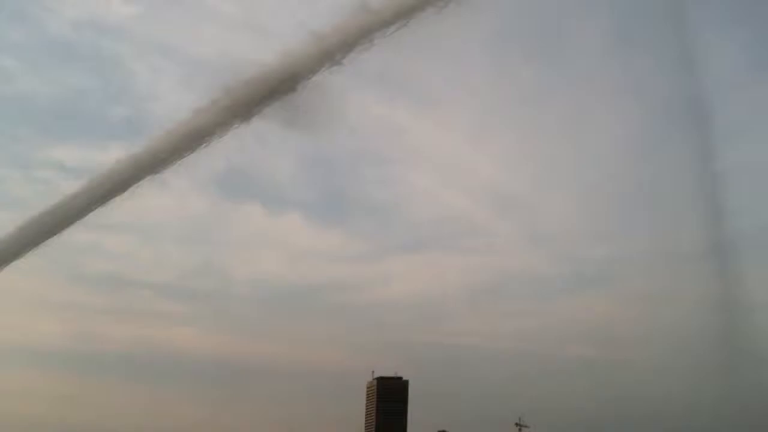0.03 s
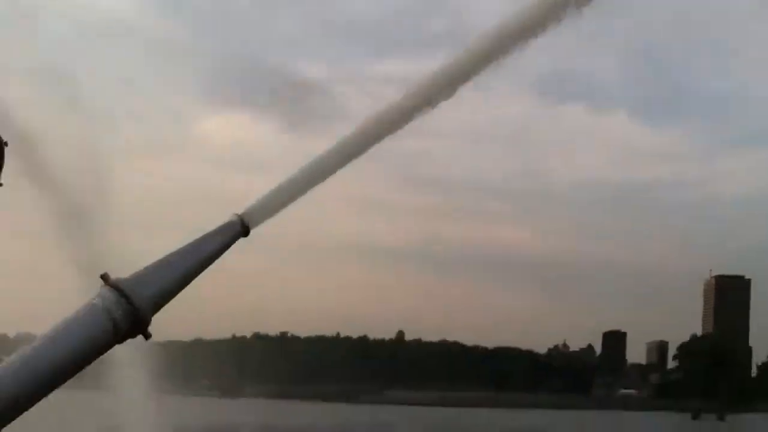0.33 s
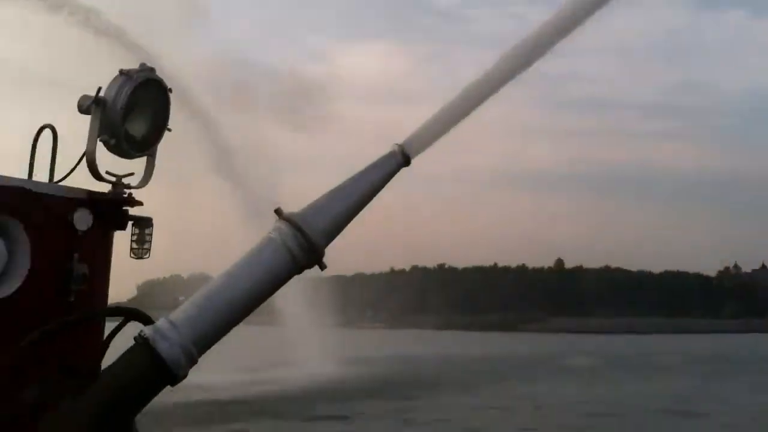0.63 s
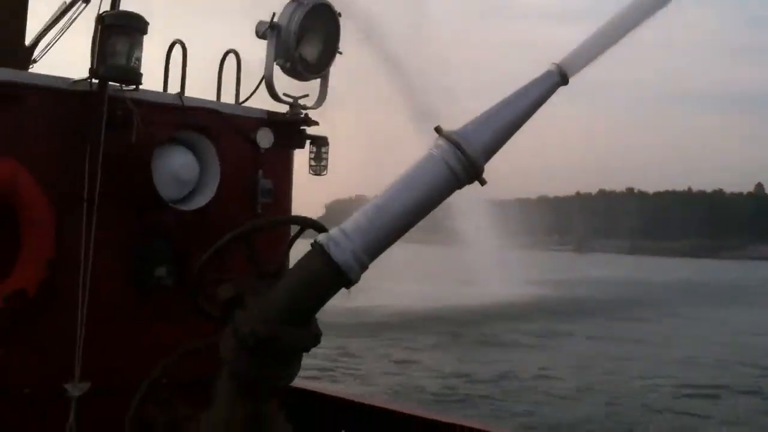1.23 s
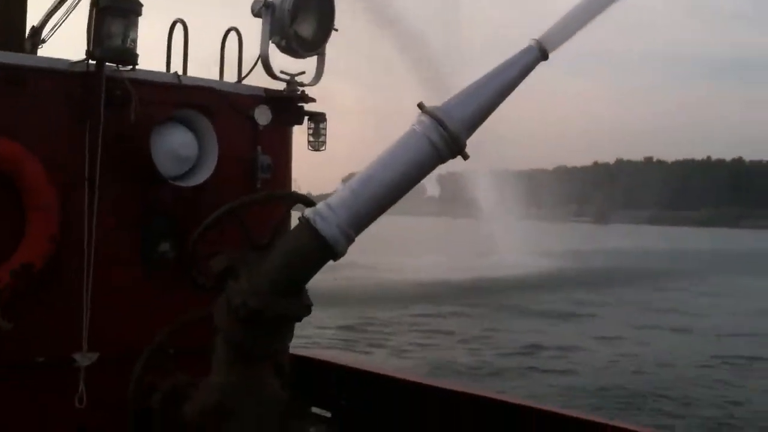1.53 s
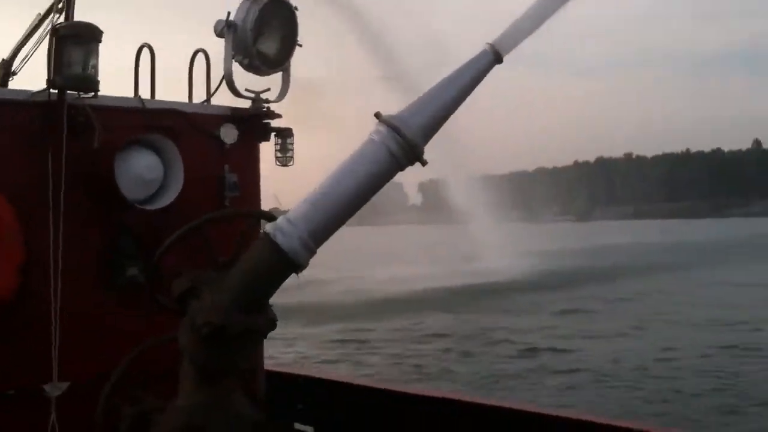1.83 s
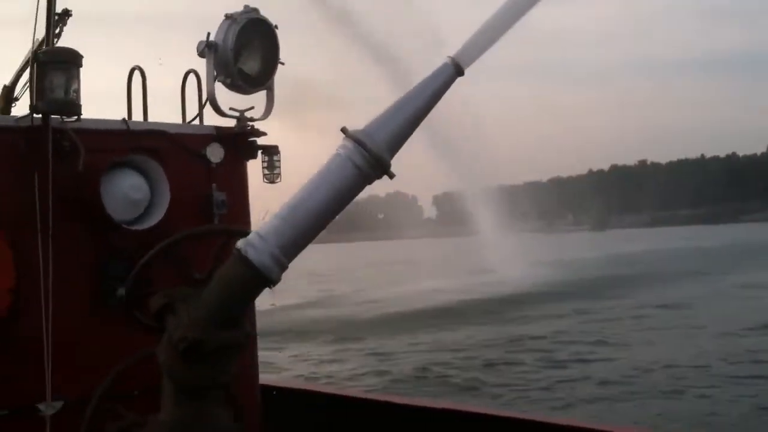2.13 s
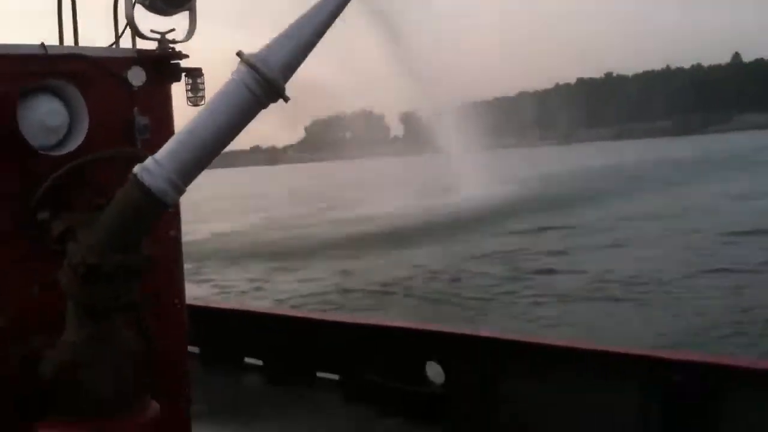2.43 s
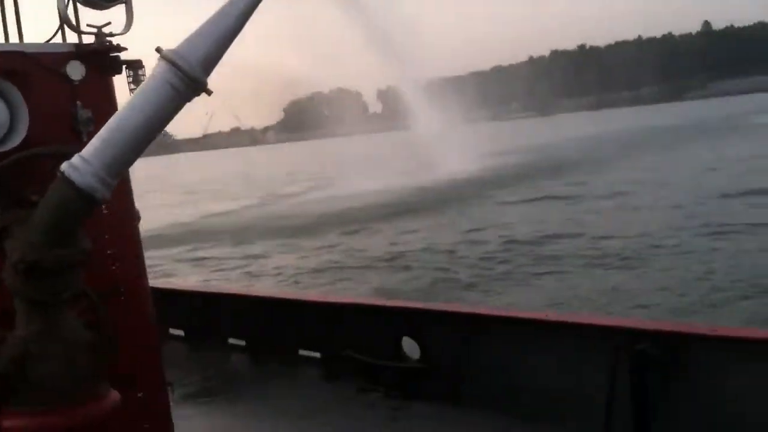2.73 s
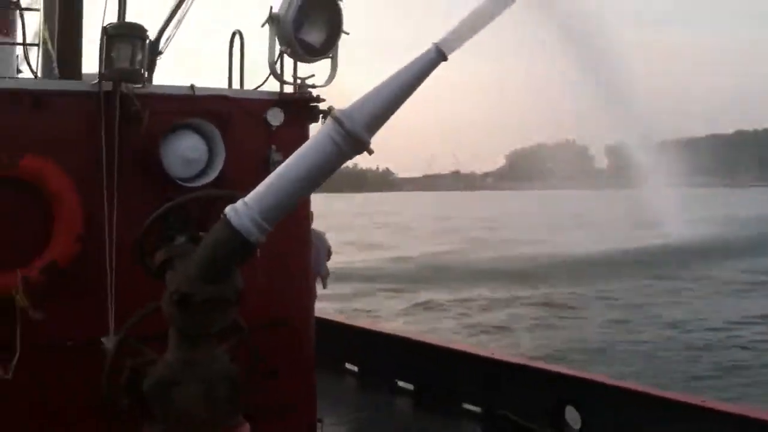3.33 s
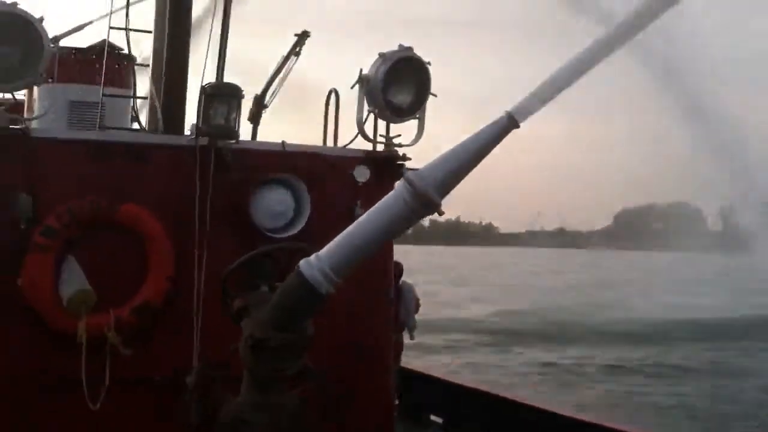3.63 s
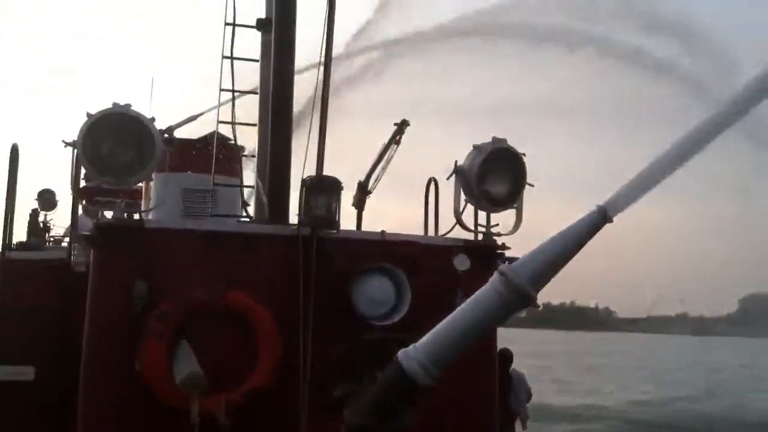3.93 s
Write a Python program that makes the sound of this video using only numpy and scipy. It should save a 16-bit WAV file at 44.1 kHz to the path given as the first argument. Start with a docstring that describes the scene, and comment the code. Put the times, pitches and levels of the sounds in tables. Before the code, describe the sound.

A jet of water rushes and softly spits from a cannon on a fire boat, while engines hum and rumble below deck. As the microphone backs away from the nozzle, the hiss thins and the machinery sounds boomier.

```python
"""A water cannon on the deck of a fire boat throws a steady jet over open water.
The churning jet rushes, spits now and then, and sheds a fine spray of hissing droplets.
Below deck the pump's diesel throbs and beats against the hum of a second, faster machine,
and the machinery makes the hull rumble. As the listener steps slowly back from the nozzle,
the spray fades and a boom from the deckhouse swells."""
import sys
import numpy as np
from scipy import signal
from scipy.fft import rfft, irfft
from scipy.io import wavfile
from scipy.ndimage import uniform_filter1d

SR = 44100
rng = np.random.default_rng(int(sys.argv[2]) if len(sys.argv) > 2 else 0)


def int16_out(signal):
    """Quantize to a 16-bit WAV file."""
    q = np.round(np.clip(np.atleast_2d(signal).T, -1, 1) * 32767)
    wavfile.write(sys.argv[1], SR, q.astype(np.int16))


N = 176400
T = np.arange(N) / SR
FREQS_HZ = np.fft.rfftfreq(N, 1 / SR)
DIESEL_CYCLE_HZ, SHAFT_HZ = 9.5, 28.77

# The tone of the jet's rush. Each row: frequency in Hz, relative level in dB.
JET_SPECTRUM = [(100, -17), (400, -1.5), (720, 1), (1020, -1), (1350, -7), (1750, -9.5), (2400, -16.5),
                (3200, -23.5), (4000, -24), (5000, -29), (7000, -35.5), (10000, -42.5), (12500, -46),
                (15500, -54)]
# How loud the rush is. Each row: time in seconds, level in dB.
JET_LEVELS = [(0, -49), (.6, -51), (1.4, -51), (2, -51.5), (2.8, -51.5), (3.4, -51), (4, -51.5)]
# A hollow note in the rush. Each row: time in seconds, level in dB.
HOLLOW_LEVELS = [(0, -70), (1, -59), (1.6, -65), (2.35, -59), (2.68, -61.5), (2.8, -53), (2.9, -60),
                 (3.02, -61), (3.2, -65), (3.7, -64), (4, -55.5)]
# The tone of the spray's hiss. Each row: frequency in Hz, relative level in dB.
SPRAY_SPECTRUM = [(500, -11.5), (1500, 4.5), (2500, 7.5), (4200, -5), (5500, -12), (10000, -25),
                  (12500, -25), (15500, -34)]
# How loud the spray is. Each row: time in seconds, level in dB.
SPRAY_LEVELS = [(0, -71), (.4, -67), (.7, -67.5), (1.35, -66.5), (1.6, -68.5), (2.2, -68), (2.9, -70),
                (3.3, -75), (4, -77)]
# The diesel's tones. Each row: multiple of its cycle rate, level in dB before the swell.
DIESEL_TONES = [(6, -69.5), (8, -62), (9, -60.5), (10, -57.5), (12, -57), (13, -52), (14, -51), (15, -48),
                (16, -58.5), (17, -52), (18, -48), (19, -54.5), (24, -54.5), (26, -57)]
# The throb swells and fades along the deck. Each row: time in seconds, gain in dB.
DIESEL_SWELL = [(0, -2), (1, -2), (1.5, -1.5), (1.9, -1.5), (2.15, 3), (2.5, -2.5), (3.2, -1), (4, -3)]
# Two of the faster machine's hums along the deck. Each row: time in seconds, level in dB.
LOW_HUM_LEVELS = [(0, -38.5), (.3, -54.5), (.45, -47.5), (.95, -42), (1.07, -53), (1.2, -42), (1.5, -42.5),
                  (2, -50.5), (2.9, -52), (3.3, -45), (4, -47)]
HIGH_HUM_LEVELS = [(0, -68), (.7, -62), (1.4, -61), (2, -57), (2.3, -52), (2.52, -49.5), (2.85, -50.5),
                   (3.3, -55), (4, -56)]
# Its other tones. Each row: multiple of its shaft rate, level in dB.
SHAFT_TONES = [(4, -59.5), (5, -59), (7, -48.5), (8, -61.5)]
# The tone of the hull's rumble. Each row: frequency in Hz, relative level in dB.
RUMBLE_SPECTRUM = [(20, -42.5), (36, -29.5), (50, -15), (95, -9), (130, -5.5), (165, -0.5), (210, -3.5),
                   (270, -6.5), (380, -8.5), (490, -9.5), (590, -16.5), (900, -35.5), (2000, -67.5)]
# How loud the rumble is. Each row: time in seconds, level in dB.
RUMBLE_LEVELS = [(0, -40), (.8, -40.5), (1.4, -43), (2, -40.5), (2.4, -40), (3, -40.5), (3.6, -40.5),
                 (4, -39.5)]
# The boom of the deckhouse. Each row: time in seconds, level in dB.
BOOM_LEVELS = [(0, -58.5), (2.4, -59), (2.9, -57), (3.3, -43), (3.7, -46), (4, -55)]
# Notes at which hull and pump ring. Each row: pitch in Hz, width in Hz, level in dB.
HULL_RINGS = [(51.6, 4.9, -71), (60, 2.2, -58), (171.2, 13, -50), (482, 22, -57), (634, 12, -62),
              (2079, 17, -78)]
# Spits of water from the nozzle. Each row: time of the peak in seconds,
# rough half length in seconds, pitch in Hz, width in Hz, peak level in dB.
NOZZLE_SPITS = [(.15, .035, 1200, 800, -64), (0.273, .09, 4170, 1200, -78), (0.42, .03, 1400, 1200, -64),
                (.55, 0.036, 1800, 1200, -61.5), (1.39, 0.067, 1400, 1200, -64),
                (2.563, 0.029, 3100, 1200, -73), (3.56, 0.018, 3200, 1200, -67.5)]


def amp(db):
    """Turns decibels into a number to multiply by."""
    return 10 ** (np.asarray(db) / 20)


def unit(x):
    """Scales a signal to an average strength (rms) of one."""
    return x / np.sqrt(np.mean(x ** 2) + 1e-20)


def curve(points):
    """Joins (time, value) points with straight lines."""
    return np.interp(T, *np.transpose(points))


def colour(x, spectrum):
    """Shapes a sound's bass and treble by (Hz, dB) points, then scales it to strength one."""
    hz, db = np.transpose(spectrum)
    gain = amp(np.interp(np.log(FREQS_HZ + 1), np.log(hz), db))
    return unit(irfft(rfft(x) * gain, N))


def wander(rate_hz):
    """A random wobble of strength one, moving no faster than about the given rate."""
    noise = rfft(rng.standard_normal(N)) * (FREQS_HZ > 0)
    return unit(irfft(noise / (1 + (FREQS_HZ / rate_hz) ** 4), N))


def resonance(hz, width_hz):
    """Noise of strength one around a pitch: the narrower it is, the more it rings."""
    noise = rfft(rng.standard_normal(N))
    return unit(irfft(noise / (1 + ((FREQS_HZ - hz) / (width_hz / 2)) ** 2), N))


def turbulence(patchy_db, patch_hz, patch_s):
    """Churning noise: its level drifts in small patches of time and frequency."""
    size, hop = 512, 128
    grid = signal.stft(rng.standard_normal(N), nperseg=size, noverlap=size - hop)[2]
    bands = max(1, round(patch_hz * size / SR))
    frames = max(1, round(patch_s * SR / hop))
    patches = uniform_filter1d(rng.standard_normal(grid.shape), bands, axis=0)
    patches = unit(uniform_filter1d(patches, frames, axis=1))
    return signal.istft(grid * amp(patchy_db * patches), nperseg=size, noverlap=size - hop)[1][:N]


def jet(flutter_db=0.24):
    """Water churns as it leaves the nozzle: a rush, with a hollow note that comes and goes."""
    rush = colour(turbulence(patchy_db=0.84, patch_hz=500, patch_s=0.1), JET_SPECTRUM)
    hollow = amp(curve(HOLLOW_LEVELS)) * resonance(hz=985, width_hz=230)
    return amp(curve(JET_LEVELS) - flutter_db * wander(9.8)) * rush + hollow


def spray(drops_per_s=5000, surge_db=0.6):
    """Droplets tear off the jet in surges; their tiny clicks blur into a hiss."""
    sizes = amp(np.minimum(rng.exponential(1, N), 3.5))
    signs = rng.choice([-1., 1.], N)
    clicks = sizes * signs * (rng.random(N) < drops_per_s / SR)
    return amp(curve(SPRAY_LEVELS) + surge_db * wander(9.3)) * colour(clicks, SPRAY_SPECTRUM)


def machine(rate_hz, tones, waver_db, drift=0.0014):
    """A slightly unsteady rotation makes wavering tones at multiples of its rate."""
    turns = np.cumsum(rate_hz * (1 + drift * wander(1.0))) / SR
    sound = np.zeros(N)
    for multiple, db in tones:
        peak = np.sqrt(2) * amp(db + waver_db * wander(3.4))
        sound += peak * np.sin(2 * np.pi * (multiple * turns + rng.random()))
    return sound


def diesel():
    """The pump's engine repeats its cycle below deck, making a low throb."""
    return amp(curve(DIESEL_SWELL)) * machine(DIESEL_CYCLE_HZ, DIESEL_TONES, waver_db=2.0)


def rough_tone(hz, roughness, shake_hz=16):
    """A tone of strength one that shakes in loudness (real part) and timing (imaginary part)."""
    shake = 1 + roughness * (wander(shake_hz) + 1j * wander(shake_hz))
    tone = np.exp(2j * np.pi * (hz * T + rng.random()))
    return unit((shake * tone).real)


def hum():
    """The faster machine: a firm hum at 6 pulses a turn, a rough one at 12, and other wavering tones."""
    low = amp(curve(LOW_HUM_LEVELS)) * rough_tone(6 * SHAFT_HZ, roughness=0.095)
    high = amp(curve(HIGH_HUM_LEVELS)) * rough_tone(12 * SHAFT_HZ, roughness=0.29)
    return low + high + machine(SHAFT_HZ, SHAFT_TONES, waver_db=2.7)


def hull():
    """Shaken by the machinery, the hull rumbles and rings and the deckhouse booms."""
    rumble = amp(curve(RUMBLE_LEVELS)) * colour(rng.standard_normal(N), RUMBLE_SPECTRUM)
    boom = amp(curve(BOOM_LEVELS)) * resonance(hz=265, width_hz=204)
    rings = sum(amp(db) * resonance(hz, width_hz) for hz, width_hz, db in HULL_RINGS)
    return rumble + boom + rings


def spits():
    """Short, soft bursts of hiss where the jet frays."""
    sound = np.zeros(N)
    for peak_s, half_s, hz, width_hz, db in NOZZLE_SPITS:
        swell = np.exp(-0.5 * ((T - peak_s) / half_s) ** 2)
        sound += amp(db) * swell * resonance(hz, width_hz)
    return sound


def scene():
    """Adds the machinery below and the water above into one channel."""
    machinery = diesel() + hum() + hull()
    water = jet() + spray() + spits()
    return (machinery + water)[None]


def record(dry):
    """Cuts away the very highest treble."""
    edge_hz, fade_hz = 15720, 200
    gain = np.clip((edge_hz - FREQS_HZ) / fade_hz + 0.5, 0, 1)
    return irfft(rfft(dry) * gain, N)


dry = scene()
out = record(dry)
int16_out(out)
```